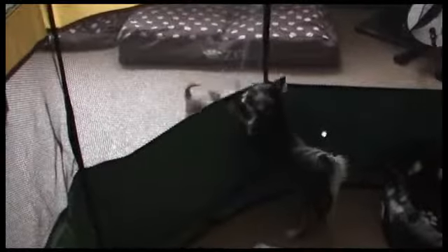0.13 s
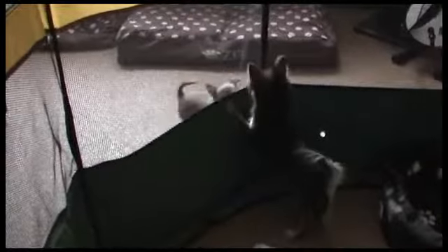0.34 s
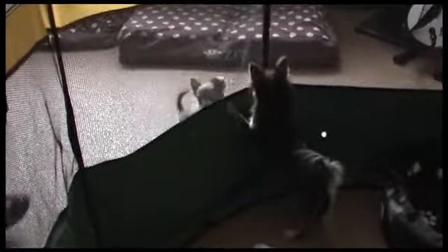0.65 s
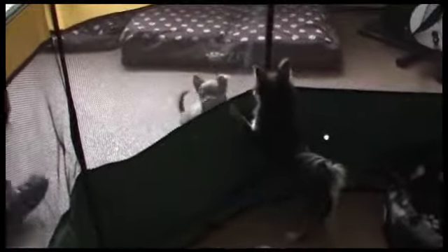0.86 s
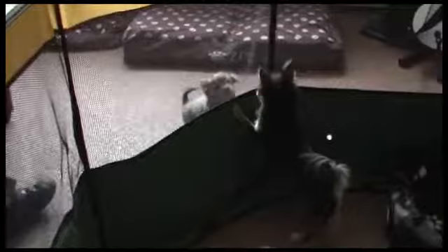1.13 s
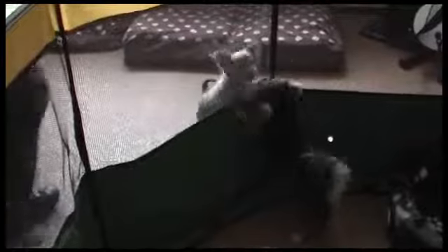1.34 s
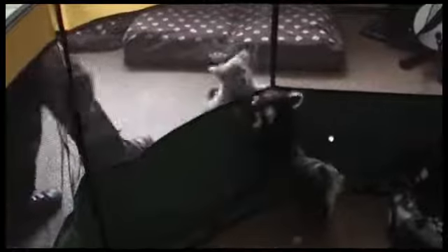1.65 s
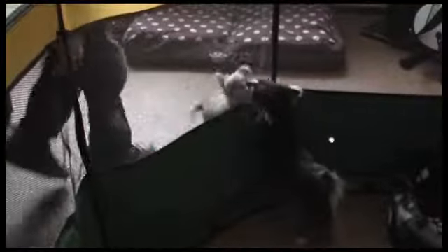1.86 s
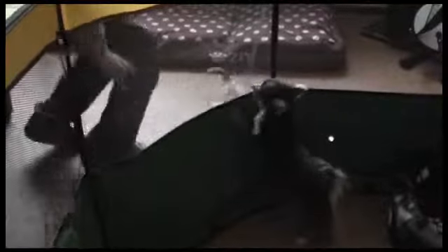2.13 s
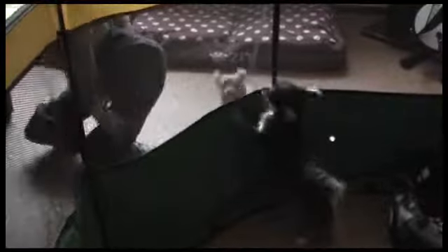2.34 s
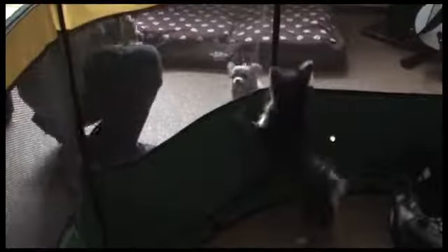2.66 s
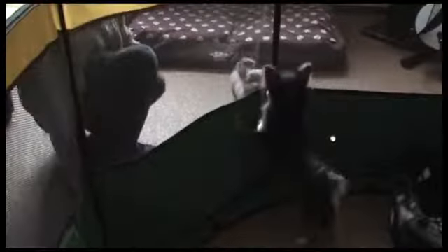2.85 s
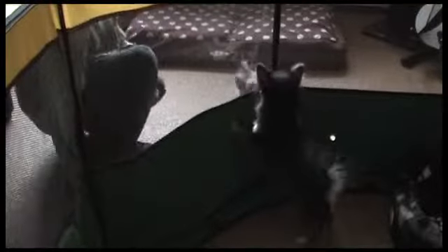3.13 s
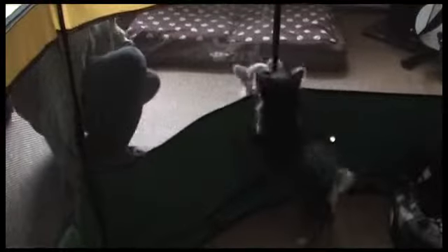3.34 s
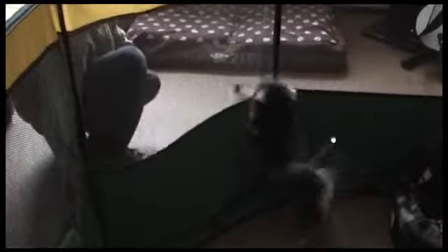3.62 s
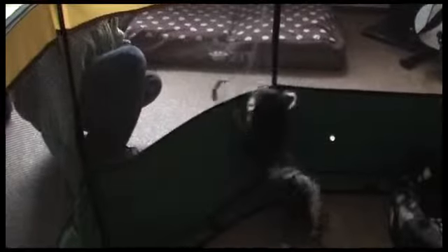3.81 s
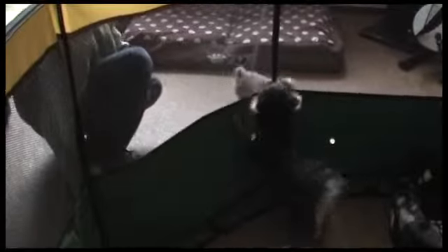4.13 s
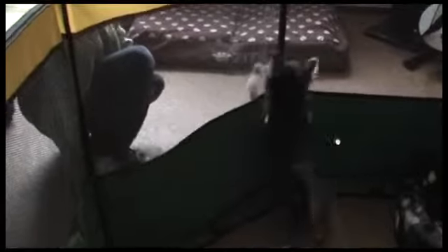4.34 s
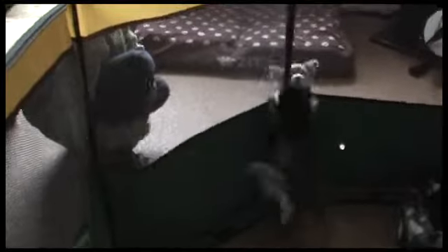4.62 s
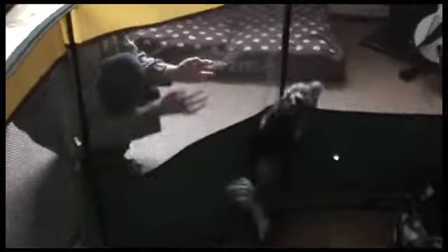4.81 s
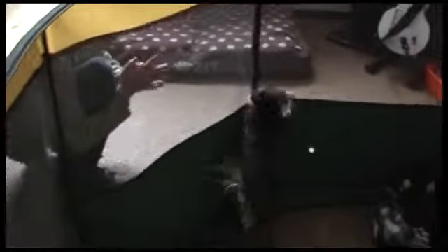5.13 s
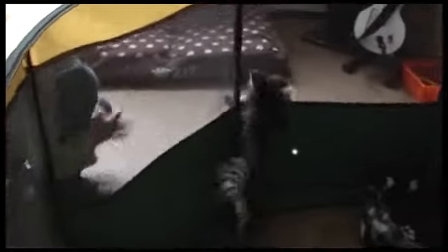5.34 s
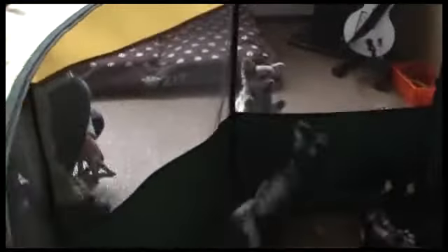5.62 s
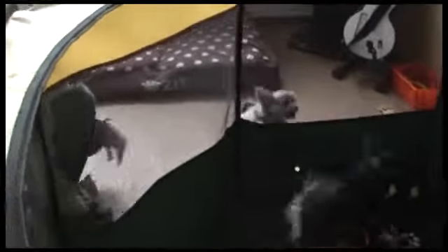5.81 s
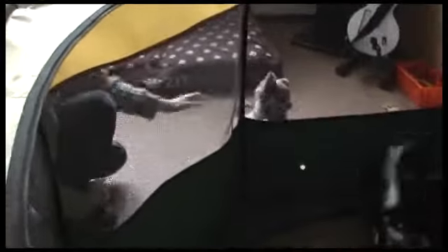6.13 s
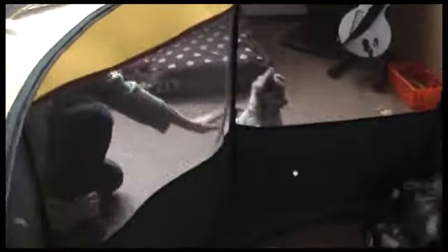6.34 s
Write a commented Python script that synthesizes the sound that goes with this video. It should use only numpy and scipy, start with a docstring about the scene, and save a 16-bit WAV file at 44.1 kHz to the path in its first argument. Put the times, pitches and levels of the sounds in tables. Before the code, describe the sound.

A puppy yips sharply in three short flurries in a bare echoing room while another whines, yelps once and scrabbles at pen fabric.

```python
"""The ring of an earlier yip dies in a quiet, bare room; then paws scrabble at fabric and claws tap.
A puppy yips eight times: harmonics of a fast pitch arch pass throat resonances and echo in the room.
A nearer, drier puppy whines and once yelps (harmonic series), growls softly (slow flaps ringing the chest)
and scrabbles at the wall of a play pen (rough friction noise). A gain control ducks the loud sounds and
recovers slowly."""
import sys
import numpy as np
from scipy import signal
from scipy.io import wavfile
from scipy.ndimage import uniform_filter1d

SR = 44100
rng = np.random.default_rng(int(sys.argv[2]) if len(sys.argv) > 2 else 0)


def store_pcm(level_fs):
    """Save levels as 16-bit WAV."""
    pcm = np.round(np.clip(level_fs, -1, 1) * 32767).astype(np.int16)
    wavfile.write(sys.argv[1], SR, np.atleast_2d(pcm).T)


N = 285327

# Yips of the main puppy. Each row: time the throat snaps open, soft lead-in, rise and stay on top in seconds,
# pitch at the snap, shoulder and top in Hz, effort at the snap and top in dB, brightness at the snap and top
# in dB per octave, extra second harmonic in dB, burst of air in dB.
YIP_GESTURES = [(1.410, .012, 0.09, 0.0068, 854, 1340, 1442, -12.5, -15.5, 2.5, 2, 0.5, -9.5),
                (1.751, 0.032, 0.079, 0.016, 967, 1320, 1732, -18.5, -12, 0.5, -1.5, -0.7, -38),
                (1.972, 0.0084, 0.062, .014, 1096, 1559, 1757, -22.5, -13, 1.5, -4.5, 4, -38),
                (3.921, 0.0016, .085, .022, 779, 1380, 1668, -20.5, -10, 3.5, -8, 4.5, -10),
                (4.294, 0.018, 0.081, 0.0029, 853.5, 1333, 1538, -15.5, -14.5, 1, 0, 2.7, -28),
                (4.622, .008, .084, 0.00295, 816, 1286, 1478, -17.5, -22, 0, 4, 10, -38),
                (5.355, 0.0015, 0.096, .005, 847, 1534, 1737, -6, -13, 2.5, 2, 3.5, -5),
                (5.744, 0.029, 0.077, 0.014, 941, 1439, 1724, -16, -11.5, 0.5, -11, 4.2, -24)]
EDGE_HZ = 16200  # upper limit of the recorded band; harmonics above it are left out


def gain_of(db):
    """Level law: 20 dB is a factor of ten in amplitude."""
    return 10 ** (np.asarray(db) / 20)


def evened(x):
    """Power normalisation: scales a signal to rms 1."""
    return x / np.sqrt(np.mean(x ** 2) + 1e-20)


def read(points, hz):
    """Interpolation on a log-frequency axis, as the ear spaces pitch."""
    f, value = np.transpose(points)
    return np.interp(np.log(hz + 1), np.log(f + 1), value)


def add(mix, s, sound):
    """Superposition: mixes a sound in at s seconds."""
    part = mix[round(s * SR):][:len(sound)]
    part += sound[:len(part)]


def wobble(count, size):
    """Random modulation: noise low-passed by two running means, of rms 1."""
    once = uniform_filter1d(rng.standard_normal(count), size)
    return evened(uniform_filter1d(once, size))


def peaks(modes, hz):
    """Resonance: summed gain of modes with steep skirts."""
    return sum(gain_of(db) / (1 + (2 * (hz - f) / width) ** 2) for f, width, db in modes)


def joined(t, knots, values):
    """Piecewise-linear contour with rounded corners."""
    return uniform_filter1d(np.interp(t, knots, values), size=130, mode="nearest")


def swell(attack, hold, release):
    """Envelope: time and relative level in dB of a sound that swells, holds and dies away."""
    edge_db = -18  # level at the beginning and end
    knots = np.cumsum([0, attack, hold, release])
    t = np.arange(0, knots[-1], 1 / SR)
    return t, joined(t, knots, [edge_db, 0, 0, edge_db])


def noise(db, size):
    """Partially coherent stereo noise, shaped by db, a function of (Hz, s)."""
    # Each row: frequency in Hz, left-right correlation.
    likeness = [(60, 0.45), (300, 0.87), (3000, 0.87), (12000, 0.69)]
    hop = size // 4
    hz = np.fft.rfftfreq(size, 1 / SR)[:, None]
    t = np.arange(N // hop + 5) * hop / SR
    a, b, c, d = rng.standard_normal((len(t), len(hz), 4)).T
    same = np.clip(read(likeness, hz), -1, 1)
    left = a + 1j * b
    right = same * left + np.sqrt(1 - same ** 2) * (c + 1j * d)
    spectra = np.array([left, right]) * gain_of(db(hz, t))
    return signal.istft(spectra, nperseg=size, noverlap=size - hop)[1][:, :N]


def room_air():
    """Stationary noise: a steady coloured background."""
    # Each row: frequency in Hz, relative spectral density in dB per Hz.
    spectrum = [(18, -42), (30, -21.5), (210, 2), (303, -10), (404, -1.5), (600, -8.5), (2230, -16),
                (3670, -21), (10200, -19), (14400, -33), (16000, -31)]
    level_db = -56.5
    return gain_of(level_db) * evened(noise(lambda hz, t: read(spectrum, hz) + 0 * t, size=1024))


def linger():
    """Exponential decay: what still rings in the room from an earlier yip."""
    # Each row: centre in Hz, width in Hz, relative level in dB.
    bands = [(2520, 380, 5.5), (1600, 2150, 0.5), (5000, 5400, -17.5)]
    level_db, t60 = -32, 0.6  # level before the decay in dB, decay time in s
    rings = noise(lambda hz, t: 20 * np.log10(peaks(bands, hz)) + 0 * t, size=1024)
    return evened(rings) * gain_of(level_db - 60 * np.arange(N) / SR / t60)


def room(x):
    """Reverberation: dense random reflections, each band decaying at its own rate."""
    # Each row: frequency in Hz, reverberation time t60 in seconds.
    decay = [(150, .8), (550, .6), (1700, .85), (4500, .74), (10000, .5)]
    build_s = .035  # the reflections thicken over this time
    ahead_hz, ahead_db = 2920, -3  # the muzzle beams its treble forward: the room gets less, dB per octave above
    count = 60000

    def colour(hz, t):
        beam_db = ahead_db * np.log2(1 + (hz / ahead_hz) ** 2) / 2
        return beam_db - 60 * t / read(decay, hz)
    reflections = noise(colour, size=256)[:, :count]
    reflections = reflections * np.clip(np.arange(count) / SR / build_s, 0, 1)
    return signal.fftconvolve(x[None], reflections / np.linalg.norm(reflections[0]), axes=1)[:, :N]


def early(x):
    """Comb interference: direct sound plus single echoes makes gliding partials throb."""
    # Floor and wall echoes. Each row: delay in seconds, level in dB re the direct sound.
    echoes = [(.0031, -6), (.0074, -9), (0.0115, -11), (0.018, -14)]
    out = x.copy()
    for s, db in echoes:
        add(out, s, gain_of(db) * x)
    return out


def tap(db, hz, thud_db, thud_hz=110, thud_t60=0.014):
    """Transient: a short band of noise around its centre and a damped low thud."""
    t = np.arange(4000) / SR
    tick_t60 = .011
    hz = np.clip(hz, 300, 9000)
    band = signal.butter(2, [hz / 2.2, min(hz * 2.2, 14000)], "band", fs=SR)
    tick = signal.lfilter(*band, rng.standard_normal(len(t)))
    tick = evened(tick) / 2 * gain_of(-60 * t / tick_t60)
    thud = np.sin(2 * np.pi * thud_hz * t) * gain_of(thud_db - 60 * t / thud_t60)
    return gain_of(db) * (tick + thud)


def scrabble(frame_hz=200):
    """Stick-slip friction: patchy noise, roughened by threads that catch and slip."""
    # Paw strokes on fabric. Each row: start, attack, hold and release in seconds, level in dB,
    # brightness in dB per octave, weight of the body on the frame in dB.
    strokes = [(0.189, 0.034, 0.011, 0.12, -37.5, 3, 17), (0.499, 0.04, 0.017, 0.047, -54, -1, -10),
               (1.317, 0.0056, 0.11, .012, -48, 8.5, 5), (2.824, 0.051, 0.11, 0.074, -35.5, 6, -7),
               (3.12, 0.11, .03, 0.5, -52, 5, 9), (3.412, 0.08, 0.11, 0.13, -17.5, 2.5, -30),
               (3.617, 0.098, .12, 0.12, -23, 9, 26), (4.15, 0.092, 0.11, .02, -35.5, 5, 0),
               (4.445, 0.034, 0.16, 0.049, -35.5, 6, 5), (5.445, 0.021, 0.22, 0.18, -44.5, -4.5, -8),
               (4.79, 0.18, .11, 0.06, -20.5, 3.5, -67), (5.0, 0.11, 0.089, 0.069, -23.5, 7.5, 22.5),
               (6.047, .17, 0.06, 0.11, -47, 3, 9)]
    # Each row: frequency in Hz, relative spectral density in dB per Hz.
    fabric = [(24, -48), (40, -51), (176, -3.5), (305, 5.5), (392, 2), (942, 3), (1210, -0.5), (2100, -4.5),
              (3300, -13), (9450, -24.5), (16000, -54.5)]
    grain_db, patchy_db = 2.5, 3  # rms roughness in time, rms unevenness of the spectrum
    level, bright, weight_db = np.zeros((3, N))
    for s, attack, hold, release, db, stroke_bright_db, stroke_weight_db in strokes:
        gain = gain_of(db + swell(attack, hold, release)[1])
        add(level, s, gain)
        add(bright, s, gain * stroke_bright_db)  # overlapping strokes blend, the louder one leading
        add(weight_db, s, gain * stroke_weight_db)

    def colour(hz, t):
        patches = rng.standard_normal((len(hz), len(t)))
        patches = uniform_filter1d(uniform_filter1d(patches, size=3, axis=0), size=12, axis=1)
        at = np.minimum((t * SR).astype(int), N - 1)
        tilt, load_db = np.array([bright[at], weight_db[at]]) / (level[at] + 1e-9)
        low = 1 / (1 + (hz / frame_hz) ** 4)  # the frame answers only in the bass
        tilt_db = tilt * np.log2((hz + 500) / 2000)
        return read(fabric, hz) + tilt_db + load_db * low + patchy_db * evened(patches)
    raw = noise(colour, size=512)
    raw = raw / np.sqrt(uniform_filter1d((raw ** 2).mean(0), size=4000))  # strokes alone set the level
    return raw * level * gain_of(grain_db * wobble(N, size=30))


def growl(s, attack, hold, release, db):
    """Source and filter: slow uneven flaps ring the chest."""
    # Chest and closed mouth. Each row: resonance in Hz, width in Hz, relative level in dB.
    chest = [(212, 60, 0), (400, 120, -10), (640, 100, -14)]
    flap_hz = 52.5  # mean rate
    t, swell_db = swell(attack, hold, release)
    turns = np.cumsum(flap_hz * (1 + .05 * wobble(len(t), size=600))) / SR
    k = np.arange(3, 14)[:, None]  # harmonic numbers
    flutter = gain_of(4 * np.array([wobble(len(t), size=700) for _ in k]))
    tone = (peaks(chest, k * flap_hz) * flutter * np.cos(2 * np.pi * k * turns)).sum(0)
    return s, gain_of(db + swell_db) * evened(tone)


def whine_or_yelp(row, harmonics_db, jitter=0.017):
    """Harmonic series: a whine, or at 3.534 s a short yelp with sharp onset and falling pitch."""
    flutter_db = 2.5  # rms
    s, attack, hold, release, first_hz, last_hz, db = row
    t, swell_db = swell(attack, hold, release)
    hz = first_hz + (last_hz - first_hz) * (t / t[-1]) ** 3  # the pitch gives way late
    turns = np.cumsum(hz * (1 + jitter * wobble(len(hz), size=150))) / SR
    tone = sum(gain_of(h) * np.cos(2 * np.pi * k * turns) for k, h in enumerate(harmonics_db, start=1))
    return s, gain_of(db + swell_db + flutter_db * wobble(len(hz), size=200)) * tone


def gesture(lead, rise, hold, snap_hz, shoulder_hz, top_hz, snap_db, top_db, snap_bright_db, top_bright_db):
    """Articulation: pitch, effort, mouth and brightness through lead-in, snap, climb, leap and drop."""
    lead_hz_per_s, lead_db, lead_dull_db = 9900, -6, -13  # the half-shut lead-in climbs, softer and duller
    bend = .72  # below 1 the climb eases off
    fall_s, fall_to, fall_db = .036, .58, -10  # final drop: duration, pitch ratio, effort
    sag_db = -6.5  # effort sags after the snap
    climb_bright_db, shut_dull_db = 2, -4.5  # dB per octave won on the climb, lost as the mouth shuts
    shoulder_s = 0.63 * rise  # the last leap starts here
    end = rise + hold + fall_s
    t = np.arange(-lead, end, 1 / SR)
    climb = np.clip(t / shoulder_s, 0, 1) ** bend
    leap = joined(t, [shoulder_s, rise, rise + hold, end], [shoulder_hz, top_hz, top_hz, fall_to * top_hz])
    hz = leap - (shoulder_hz - snap_hz) * (1 - climb) + lead_hz_per_s * np.minimum(t, 0)
    knots = [-lead, -lead / 4, 0, shoulder_s, rise, end]
    mouth = joined(t, knots, [.89, .89, 1, .84, .84, .93])  # factor on the throat resonances
    dull = snap_bright_db + lead_dull_db
    bright = joined(t, knots, [dull, dull, snap_bright_db, snap_bright_db + climb_bright_db,
                               top_bright_db, top_bright_db + shut_dull_db])
    effort_db = joined(t, [-lead, -lead / 4, 0, 0.14 * rise, rise, rise + hold, end],
                       [snap_db + 2 * lead_db, snap_db + lead_db, snap_db, (snap_db + top_db) / 2 + sag_db,
                        top_db, top_db, top_db + fall_db])
    return hz, effort_db, mouth, bright


def yip(row, breath_db):
    """Source and filter: harmonics on an arching pitch pass the throat, with pulsing breath."""
    # Each row: resonance in Hz, width in Hz, relative level in dB before the sharpening power below.
    throat = [(1983, 1000, 2), (3060, 3160, -1.5), (5840, 770, 1.5), (7080, 1330, -7), (11000, 8600, -15.5)]
    sharpening, lips_hz = 1.11, 8450  # power on the resonance gain; the voice thins quickly above lips_hz
    jitter, flutter_db = .0015 + .06 * gain_of(breath_db), 4.5  # a hoarse yip also wavers more
    snap, lead, *shape, ring_db, _ = row
    hz, effort_db, mouth, bright = gesture(lead, *shape)
    waver = .015 * wobble(len(hz), size=500)  # the climb is never quite even
    turns = np.cumsum(hz * (1 + waver + jitter * wobble(len(hz), size=60))) / SR
    k = np.arange(1, 15)[:, None]  # harmonic numbers
    height = peaks(throat, k * hz / mouth) ** sharpening
    height = height * gain_of(bright * np.log2(k) + ring_db * (k == 2))
    height = height * (k * hz < EDGE_HZ) / (1 + (k * hz / lips_hz) ** 2)
    height = height * gain_of(flutter_db * np.array([wobble(len(hz), size=450) for _ in k]))
    folds = (height * np.cos(2 * np.pi * (k * turns + rng.random(k.shape)))).sum(0)
    breath = rng.standard_normal(len(hz)) * (1 + np.cos(2 * np.pi * turns))
    breath = signal.lfilter(*signal.butter(3, [2200, 7000], "band", fs=SR), breath)
    voice = gain_of(effort_db) * (folds + gain_of(breath_db) * breath)
    return snap - lead, voice * signal.windows.tukey(len(hz), .04)


def scene():
    """Direct and reverberant fields: the yipping puppy fills the room; the other is close and drier."""
    # Breath noise of each yip in dB.
    hoarse_db = [-24, -10, -26, -24, -17, -28, -27, -6]
    # Claw taps and feet; the rows at 4.237 and 4.604 s are faint treble rustles.
    # Each row: time in seconds, level in dB, centre in Hz, weight of the low thud in dB.
    taps_and_rustles = [(0.221, -23.5, 1130, -19), (.551, -44, 720, -17), (.792, -36.5, 2460, -25),
                        (.852, -33.5, 2180, -31), (1.172, -40, 822, -23), (1.328, -28.5, 3020, -24),
                        (1.377, -34, 2940, -20), (2.596, -34.5, 5000, -22), (2.834, -26.5, 3060, -28),
                        (3.158, -56, 1490, -16), (3.372, -25.5, 1970, -10), (3.416, -25, 1500, -9),
                        (4.237, -13, 8900, -34), (4.604, -13.5, 8800, -32), (4.981, -1, 7900, -35)]
    # Whines, and a yelp at 3.534 s. Each row: start, attack, hold and release in seconds,
    # first and last pitch in Hz, level in dB.
    whines_and_yelp = [(3.44, 0.046, 0.051, 0.0077, 456, 530, -13.5), (3.534, .001, .04, .03, 880, 770, -8),
                       (3.588, 0.049, 0.02, 0.18, 575.6, 577.6, -10),
                       (4.349, 0.026, .07, 0.19, 680, 663, -35),
                       (4.841, 0.019, 0.014, 0.015, 540, 530, -27.5),
                       (4.821, 0.036, 0.159, 0.034, 922, 954, -23.5),
                       (4.902, 0.025, 0.077, 0.044, 1075, 1122, -22.5)]
    # Each row: levels in dB of the harmonics of one whine or yelp, from the first up.
    harmonic_levels = [(0, -16, -20, -24, -28, -32, -36), (-16, 0, -6, -6, -14, -9, -18),
                       (0, -18, -8, -15, -14, -14, -20), (0, -14, -22), (0, -20, -30), (0, -10, -26),
                       (0, -18, -28)]
    # Each row: start, attack, hold and release in seconds, level in dB.
    growls = [(1.515, 0.027, 0.33, 0.036, -41), (2.2, 0.059, 0.044, 0.33, -42.5),
              (3.55, 0.13, 0.08, 0.2, -31.5)]
    far, near, ticks = np.zeros((3, N))
    for row, breath_db in zip(YIP_GESTURES, hoarse_db):
        add(far, *yip(row, breath_db))
        add(ticks, row[0], tap(row[-1], hz=5800, thud_db=-13))  # burst of air with a low puff
    for s, *row in taps_and_rustles:
        add(ticks, s, tap(*row))
    for row, harmonics_db in zip(whines_and_yelp, harmonic_levels):
        add(near, *whine_or_yelp(row, harmonics_db))
    for row in growls:
        add(near, *growl(*row))
    wall = scrabble()
    sent = gain_of(-5.5) * far + .5 * ticks + .15 * near + gain_of(-12) * wall.mean(0)
    near_stereo = near * gain_of([[-.6], [.6]])  # slightly to the right
    return early(far + ticks) + near_stereo + wall + room(sent) + room_air() + linger()


def record(dry, knee_db=-35, recover_db=65, attack=300):
    """Compression: the gain falls within ms (attack in samples) and recovers slowly; then the band limit."""
    dry = signal.lfilter(*signal.butter(1, 50, "high", fs=SR), dry)  # the microphone drops the deep bass
    power = signal.lfilter([1 / attack], [1, 1 / attack - 1], (dry ** 2).mean(0))
    power_db = 10 * np.log10(abs(power) + 1e-12)
    share = .48  # part of the excess that is taken back
    fall = np.arange(N) * recover_db / SR  # the held level sinks by recover_db dB per second
    held_db = np.maximum.accumulate(power_db + fall) - fall
    over_db = np.maximum(held_db - knee_db, 0)
    ducked = dry / gain_of(share * uniform_filter1d(over_db, size=100))
    ducked = .75 * np.tanh(ducked / .75)  # the input stage rounds the highest peaks
    low_pass = signal.firwin(1023, EDGE_HZ, window=("kaiser", 9), fs=SR)
    return signal.oaconvolve(ducked, low_pass[None], "same")


dry = scene()
out = record(dry)
store_pcm(out)
```